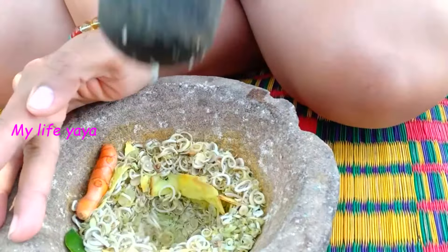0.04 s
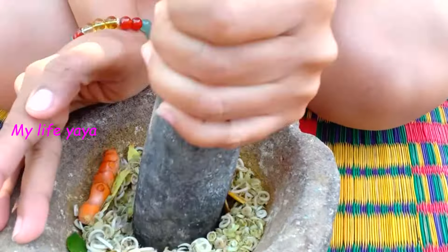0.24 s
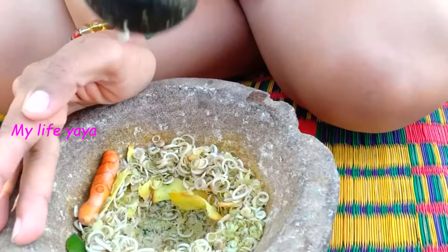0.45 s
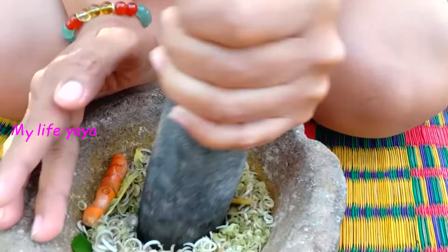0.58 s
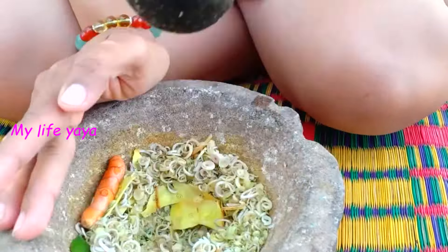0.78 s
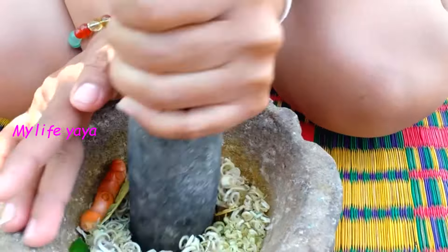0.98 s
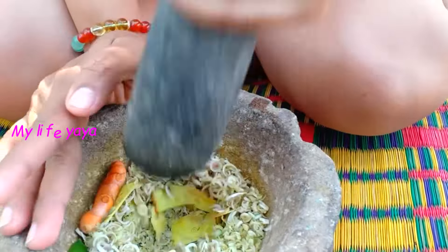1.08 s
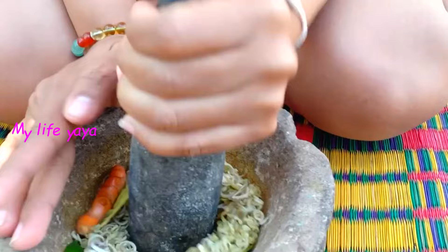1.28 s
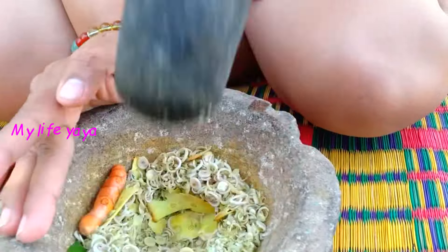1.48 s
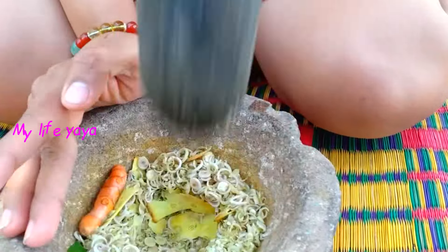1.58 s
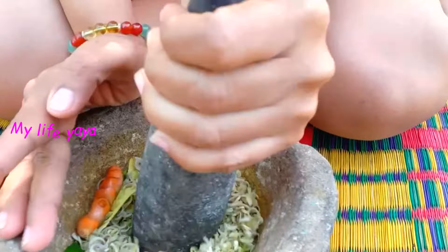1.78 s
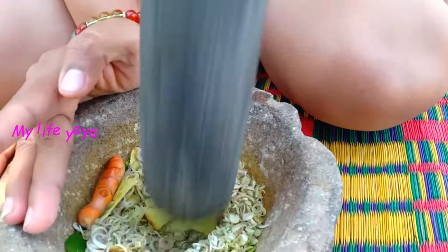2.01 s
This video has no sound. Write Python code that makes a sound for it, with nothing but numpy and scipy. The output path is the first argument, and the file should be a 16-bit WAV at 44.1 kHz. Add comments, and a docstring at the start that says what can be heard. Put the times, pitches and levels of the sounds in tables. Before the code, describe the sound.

Steady sharp stone-on-stone knocks with a slight herb crunch, a pestle working in a heavy mortar

```python
"""Outdoors on a mat, a stone pestle pounds chopped herbs in a stone mortar, close to two microphone ports.
Each blow crunches through the herbs (shaped noise), knocks stone on stone (a short force on ringing
modes) and thumps the ground (decaying low tones); nearby surfaces answer the stone diffusely. Light
wind puffs on the ports, birds whistle far off and the air hisses. The right channel runs about 10 ms late."""
import sys
import numpy as np
from scipy import signal
from scipy.fft import rfft, irfft, next_fast_len
from scipy.io import wavfile
from scipy.ndimage import uniform_filter1d, map_coordinates

SR = 44100
rng = np.random.default_rng(int(sys.argv[2]) if len(sys.argv) > 2 else 0)


def put_to_file(sound):
    """Save the sound as 16-bit audio at rate SR, in the file named by the first command-line argument."""
    columns = np.atleast_2d(sound).T  # one column per channel
    safe = np.clip(columns, -1, 1)
    whole_steps = np.round(safe * 32767)
    wavfile.write(sys.argv[1], SR, whole_steps.astype(np.int16))


N = 90404  # length [samples]

# Pestle blows: (time [s], knock level [dB], contact [ms], thump [dB], jolt [dB], crunch [dB], settling [dB],
# crack [dB], crack centre [Hz], crack treble [dB], crunch lead [ms], left over right [dB])
PESTLE_BLOWS = [(0.223, -8, 0.18, -36, -22, -42, -56.5, -33.5, 5000, 1.5, 23, 0),
                (0.6062, -15.5, 0.26, -36, -22.5, -42, -53, -31.5, 4700, 0.5, 28, 0),
                (0.9941, -7, 0.16, -42.5, -25.5, -44.5, -56.5, -32, 5500, -1.5, 25, 2),
                (1.3841, -23.5, 0.45, -36, -29, -41, -57, -35, 4770, -4.5, 30, 3.5),
                (1.7499, -12, 0.32, -33.5, -24, -41.5, -57.5, -25, 2360, -6, 25, 2.5)]


def knocks():
    """A short force rings the stone modes of the mortar, after a dip in pressure as the pestle lands."""
    # Resonances of the mortar: (frequency [Hz], t60 [s], left [dB], right [dB])
    mortar_modes = [(480, 0.0097, -7, -8), (864, 0.0066, 8.5, 5), (866, 0.01, -9, -2),
                    (1110, 0.011, -16, -12), (2150, .012, 0, -9)]
    dip_db, dip_early_s, dip_width_s, dip_low_cut_hz = -6, .0008, .0005, 250  # dip level is under the knock

    def mortar_response(hz):
        response = 0
        for centre_hz, t60_s, left_db, right_db in mortar_modes:
            damping = 1j * hz * np.log(1000) / t60_s / np.pi
            gain = amp([[left_db], [right_db]])
            response = response + gain * 1j * hz / (centre_hz ** 2 - hz ** 2 + damping)
        return response

    t, out = np.arange(N) / SR, np.zeros((2, N))
    for start_s, knock_db, contact_ms, *_, pan_db in PESTLE_BLOWS:
        force = np.exp(-((t - start_s) / (contact_ms / 1000)) ** 2 / 2)
        ring = filtered(force, mortar_response)
        dip = amp(dip_db) * np.exp(-((t - start_s + dip_early_s) / dip_width_s) ** 2)
        dip = filtered(dip, lambda hz: low_cut(hz, dip_low_cut_hz))
        pan = amp([[pan_db / 2], [-pan_db / 2]])
        out += amp(knock_db) * pan * (ring / ring.max() - dip)
    return out


def rim_brush():
    """A soft brush on the rim: one brief tone whose strength wavers at random in each channel."""
    # The brush: (centre time [s], length [s], pitch [Hz], level [dB])
    centre_s, length_s, pitch_hz, level_db = (.445, .035, 800, -67)
    t = np.arange(N) / SR
    swell = np.exp(-(2 * (t - centre_s) / length_s) ** 2)
    return amp(level_db) * swell * np.sin(2 * np.pi * pitch_hz * t) * wobble(122.2)


def thumps():
    """The ground takes a jolt, a fast-decaying low tone, then swells and sinks at a lower pitch."""
    swell_hz, swell_delay_s, swell_rise_s, swell_power, crest_s = 115.5, 0.0019, 0.014, 6.7, .0133
    jolt_hz, jolt_t60_s, jolt_rise_s = 205.2, .02, .0006
    right_db = 1
    t, out = np.arange(N) / SR, np.zeros(N)
    for start_s, _, _, thump_db, jolt_db, *_ in PESTLE_BLOWS:
        after = np.maximum(t - start_s, 0)
        u = np.maximum(t - start_s - swell_delay_s, 0) / swell_rise_s
        swell = (u * np.exp(1 - u)) ** swell_power
        out += amp(thump_db) * swell * np.cos(2 * np.pi * swell_hz * (after - crest_s))
        rise = np.exp(-(np.minimum(t - start_s, 0) / jolt_rise_s) ** 2)
        decay = amp(jolt_db - 60 * after / jolt_t60_s)
        out += rise * decay * np.cos(2 * np.pi * jolt_hz * (t - start_s))
    return out * amp([[0], [right_db]])


def crunch():
    """Grainy noise grows as the pestle sinks into the herbs, cracks at the contact and settles."""
    # Colour of the crushed herbs: (frequency [Hz], left [dB], right [dB])
    herb_colour = [(305.3, -4, -5.5), (891, 3.5, -7), (1600, -3.5, 0), (2315, 2, -1), (3519, -6.5, -3),
                   (5300, -2.5, -3.5), (6190, -4.5, -9.5), (7240, -16.5, -16.5), (9960, -19.5, -22),
                   (11500, -18, -17), (13700, -9.5, -13.5), (15500, -19, -20)]
    # Colour of the bits of herb falling back: (frequency [Hz], left [dB], right [dB])
    bit_colour = [(487.2, -19, -14.5), (1464, -4.5, -11), (2447, 1.5, 1), (3851, -1, -3.5), (5300, 7, -4),
                  (6660, -10, -9.5), (9500, -8.5, -21.5), (11430, -10, -16), (13860, -1.5, -7),
                  (15450, -11.5, -28)]
    # Colour of the fine hiss over the falling bits: (frequency [Hz], left [dB], right [dB])
    spray_colour = [(6000, -40, -40.5), (8100, -8, -10), (10430, -6.5, -7), (13700, 0.5, -3),
                    (15500, -4.5, -6.5)]
    patch_db, grain_db = 2.5, 1.5
    lead_db, crunch_t60_s = 32, 0.13  # the lead-in starts this far down, one lead time before contact
    settle_t60_s, spray_t60_s, spray_db = .4, 0.22, -4.5  # spray level is relative to the bits
    crack_rise_s, crack_t60_s, crack_early_s = .0012, .021, .0005
    focus_db, focus_octaves = 8, .7  # lift of the crack centre over the far bands, and its half width
    treble_hz = 6400  # crack treble starts here and acts in full from twice this

    def grainy(colour):
        return coloured(patchy(patch_db, size=128) * amp(grain_db * wobble(600)), colour)

    t, out = np.arange(N) / SR, np.zeros((2, N))
    herbs, bits = grainy(herb_colour), grainy(bit_colour)
    spray = coloured(patchy(patch_db, size=128), spray_colour)
    for start_s, *_, crunch_db, settle_db, crack_db, crack_hz, treble_db, lead_ms, _ in PESTLE_BLOWS:
        after = np.maximum(t - start_s, 0)
        before = np.maximum(start_s - t, 0) / (lead_ms / 1000)
        out += amp(crunch_db - lead_db * before ** 2 - 60 * after / crunch_t60_s) * herbs
        out += (t > start_s) * amp(settle_db - 60 * after / settle_t60_s) * bits
        out += (t > start_s) * amp(settle_db + spray_db - 60 * after / spray_t60_s) * spray

        since = t - start_s + crack_early_s
        rise = np.exp(-(np.minimum(since, 0) / crack_rise_s) ** 2)
        burst = rise * amp(crack_db - 60 * np.maximum(since, 0) / crack_t60_s)

        def crack_tone(hz):
            octaves = np.log2((hz + 1) / crack_hz)
            focus = focus_db * (np.exp(-(octaves / focus_octaves) ** 2) - 0.5)
            return amp(focus + treble_db * np.clip(hz / treble_hz - 1, 0, 1))

        out += filtered(burst * herbs, crack_tone)
    return out


def yard(x):
    """Nearby surfaces answer with a short diffuse tail: noise that decays at its own rate in each band."""
    # Decay of the answer: (frequency [Hz], t60 [s])
    yard_decay = [(200, 0.029), (800, 0.068), (3000, .06)]
    hz, t, z = signal.stft(rng.standard_normal((2, SR // 4)), SR, nperseg=128)
    decay = amp(-60 * t / along(yard_decay, hz).T)
    tail = signal.istft(z * decay, SR, nperseg=128)[1]
    return signal.fftconvolve(x, tail / np.linalg.norm(tail[0]), axes=1)[:, :N]


def wind():
    """Air pushes on each port in its own puffs: low rumbling noise under smooth swells."""
    # Puffs on the left port: (centre time [s], length [s], level [dB])
    puffs_left = [(.11, 0.034, -66), (.465, 0.037, -57.5), (.76, 0.45, -74.5), (1.08, .05, -66.5),
                  (1.175, .04, -53.5), (1.22, 0.041, -52.5), (1.3, 0.046, -71.5), (1.56, .1, -69.5),
                  (1.67, 0.075, -68), (1.9, .1, -75)]
    # Puffs on the right port: (centre time [s], length [s], level [dB])
    puffs_right = [(0.118, 0.093, -77.5), (.74, 0.037, -73.5), (.92, .06, -73), (1.11, 0.048, -66),
                   (1.2, 0.058, -84), (1.58, 0.087, -64.5), (1.642, 0.094, -69.5), (1.7, .05, -57.5),
                   (1.95, .04, -61), (1.999, .04, -64.5)]
    # Colour of the puffs: (frequency [Hz], level [dB])
    gust_colour = [(25, 0), (60, -5.5), (90, 1.5), (170, -13.5), (300, -23), (700, -42.5), (2000, -75.5)]
    t, swells = np.arange(N) / SR, np.zeros((2, N))
    for channel, puffs in enumerate((puffs_left, puffs_right)):
        for centre_s, length_s, level_db in puffs:
            swells[channel] += amp(level_db) * np.exp(-(2 * (t - centre_s) / length_s) ** 2)
    return swells * coloured(rng.standard_normal((2, N)), gust_colour)


def birds():
    """Thin gliding whistles, blurred by distance: slow noise spreads each pitch into a narrow band."""
    # Far calls: (start [s], length [s], first pitch [Hz], last pitch [Hz], width [Hz], level [dB])
    bird_calls = [(0.295, 0.097, 2900, 3117, 250, -68.5), (0.362, 0.1, 3250, 3160, 200, -74.5),
                  (0.462, 0.031, 2550, 2540, 252, -74), (0.753, 0.17, 2900, 2870, 101, -73),
                  (.74, .25, 5550, 6900, 149.8, -87), (1.621, 0.09, 2766, 2547, 300, -68),
                  (1.644, 0.034, 5620, 5450, 200, -83)]
    t, out = np.arange(N) / SR, np.zeros((2, N))
    for start_s, length_s, first_hz, last_hz, width_hz, level_db in bird_calls:
        u = np.clip((t - start_s) / length_s, 0, 1)
        phase = 2 * np.pi * np.cumsum(first_hz + (last_hz - first_hz) * u) / SR
        noise = filtered(rng.standard_normal((2, 2, N)), lambda hz: np.exp(-(2 * hz / width_hz) ** 2))
        whistle = unit(np.sin(phase) * noise[0] + np.cos(phase) * noise[1])
        swell = np.sqrt(abs(np.sin(np.pi * u))) * (u < 1)
        out += amp(level_db) * swell * whistle
    return out


def air():
    """Steady outdoor hiss: shaped noise with faint patches of random gain."""
    # Colour of the open air: (frequency [Hz], left [dB], right [dB])
    air_colour = [(30, -7.5, 0), (99, 5.5, 5), (250, 0, 1), (800, 3, 2), (1390, -3.5, -4), (2500, 3, 2.5),
                  (3500, -6, -6), (4950, -4.5, -6.5), (6900, -11, -17), (8000, -20.5, -18.5),
                  (10000, -23, -20.5), (13000, -15.5, -17), (15500, -29.5, -22.5)]
    return amp(-70) * coloured(patchy(depth_db=2, size=512), air_colour)


def patchy(depth_db, size):
    """Two unrelated noises that share patches of random gain over time and frequency."""
    z = signal.stft(rng.standard_normal((2, N)), nperseg=size)[2]
    field = uniform_filter1d(rng.standard_normal(z.shape[1:]), 6, axis=0)  # across frequency
    field = uniform_filter1d(field, 8, axis=1)  # across time
    return signal.istft(z * amp(depth_db * unit(field)), nperseg=size)[1][:, :N]


def wobble(rate):
    """Smooth random curves, one a channel, through `rate` knots a second."""
    at = [np.arange(N) * rate / SR]
    knots = int(N * rate / SR) + 4
    return np.array([map_coordinates(rng.standard_normal(knots), at) for _ in range(2)])


def coloured(x, spectrum):
    """Two channels through a spectrum in dB, rms 1 together."""
    return unit(filtered(x, lambda hz: amp(along(spectrum, hz))))


def filtered(x, response):
    """x through a complex response of frequency."""
    m = next_fast_len(N + 8192)
    return irfft(rfft(x, m) * response(np.fft.rfftfreq(m, 1 / SR)), m)[..., :N]


def low_cut(hz, cut_hz):
    """Gain that rolls off the bass, down to half at cut_hz."""
    return hz ** 2 / (hz ** 2 + cut_hz ** 2)


def along(points, hz):
    """Each column after the frequency, read on a log frequency axis."""
    f, *columns = np.transpose(points)
    return np.array([np.interp(np.log(hz + 1), np.log(f + 1), c) for c in columns])


def amp(db):
    """Decibels to linear gain."""
    return 10 ** (np.asarray(db) / 20)


def unit(x):
    """x scaled to rms 1."""
    return x / np.sqrt(np.mean(x ** 2) + 1e-20)


def scene():
    """The stone with its answer from the yard, the ground and herbs, then wind, birds and air."""
    stone = knocks() + rim_brush()
    answer = amp(-15) * yard(stone)
    return stone + answer + thumps() + crunch() + wind() + birds() + air()


def record(dry):
    """The right channel lags; the deep bass rolls off and nothing is kept above the band limit."""
    # Constant offset, a row for each channel: (offset [full scale])
    channel_offset = [
        [0.00033],
        [.0003],
    ]
    right_late_s, bass_cut_hz, top_hz = .01016, 27.7, 15830
    late = np.array([dry[0], np.roll(dry[1], round(right_late_s * SR))])
    return filtered(late, lambda hz: (hz < top_hz) * low_cut(hz, bass_cut_hz)) + channel_offset


dry = scene()
out = record(dry)
put_to_file(out)
```